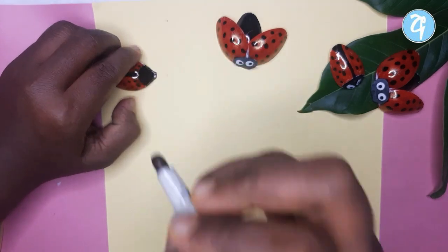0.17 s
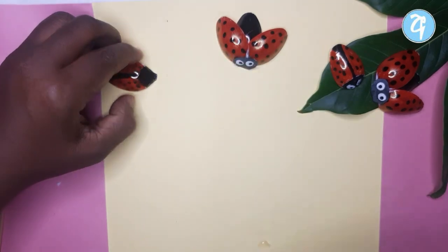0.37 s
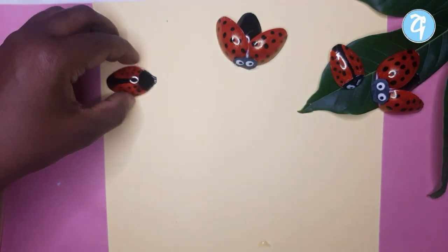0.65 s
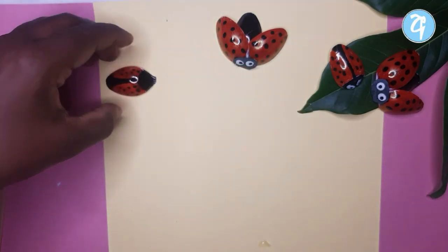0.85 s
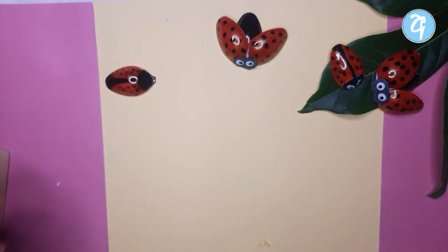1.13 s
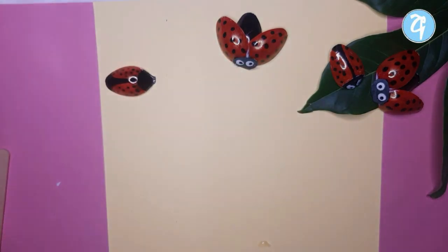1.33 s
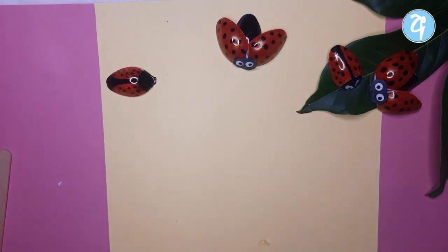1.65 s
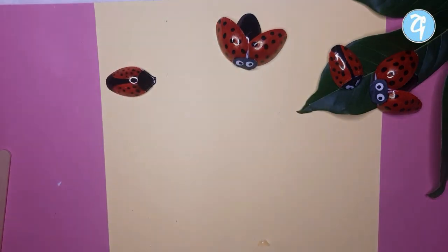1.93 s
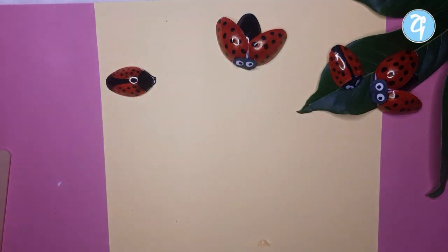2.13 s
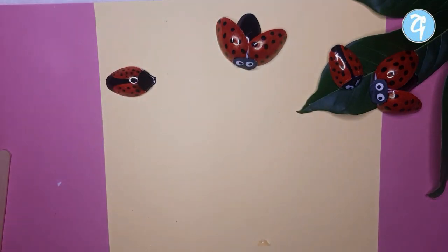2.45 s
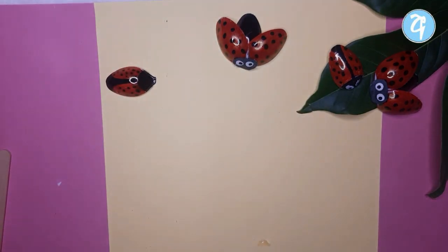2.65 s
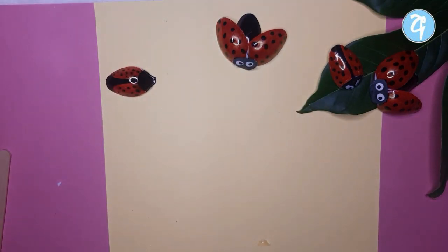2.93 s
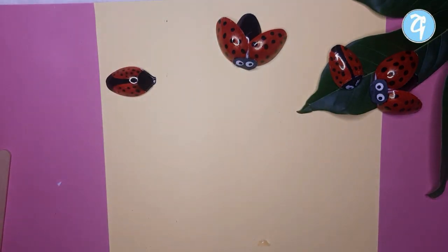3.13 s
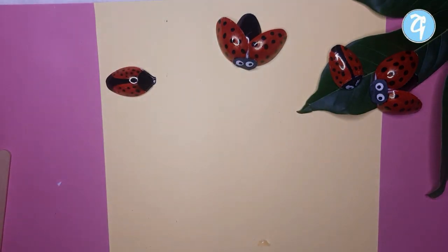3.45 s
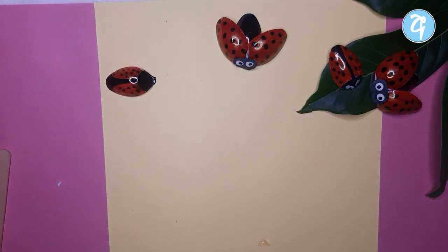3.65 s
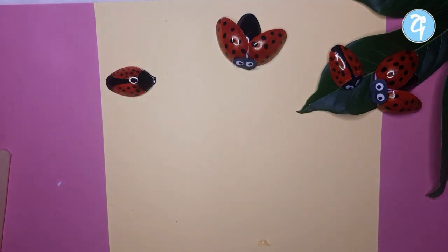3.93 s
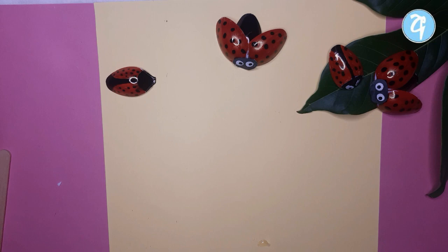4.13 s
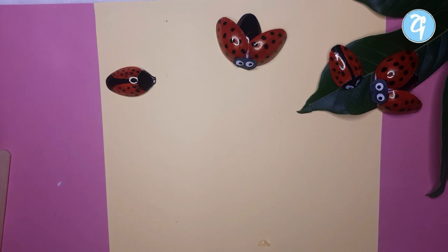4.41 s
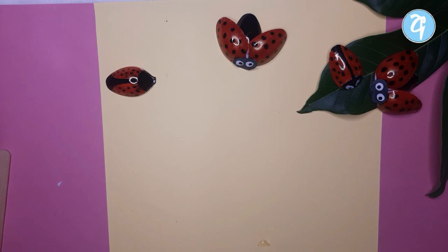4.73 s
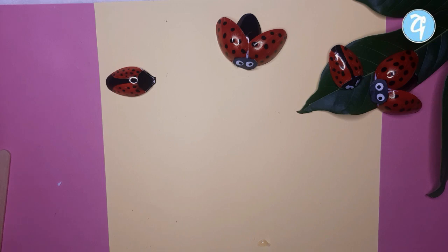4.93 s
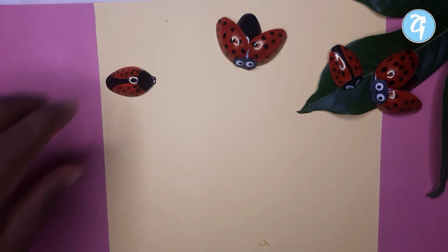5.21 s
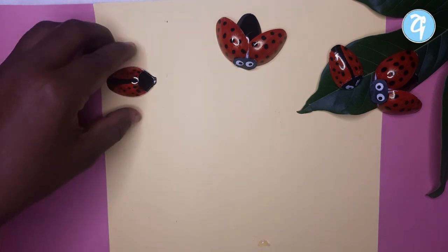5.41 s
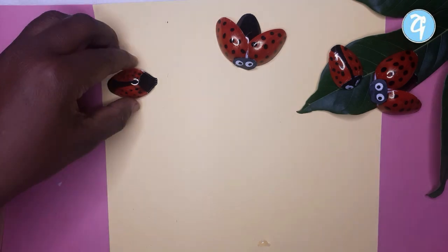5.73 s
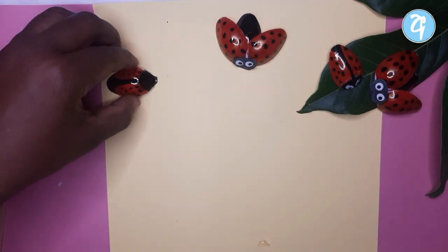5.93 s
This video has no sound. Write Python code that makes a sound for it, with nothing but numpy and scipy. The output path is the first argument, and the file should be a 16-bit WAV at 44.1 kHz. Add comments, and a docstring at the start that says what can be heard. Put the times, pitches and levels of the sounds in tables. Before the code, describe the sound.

In a quiet room, fingers handle a small plastic piece, cap a marker and set it down with three ringing knocks.

```python
"""A quiet room, the microphone close to a paper-covered craft table, the image almost mono.
Up close, fingers shift a small plastic shell over the paper, flick a piece of card and tick on a marker.
Its cap snaps shut, and the marker is put down in three knocks that set the tabletop ringing.
Farther off a cricket chirps, smeared by the walls, over room air, a fan's whine and a faint
electrical buzz."""
import sys
import numpy as np
from scipy import signal
from scipy.fft import rfft, irfft
from scipy.io import wavfile
from scipy.ndimage import uniform_filter1d

SR = 44100
rng = np.random.default_rng(int(sys.argv[2]) if len(sys.argv) > 2 else 0)


def inscribe(sig):
    """Save sig as 16-bit PCM at rate SR to the path in sys.argv[1].

    A 1-D sig is mono; a 2-D sig holds one channel per row.
    Samples are clipped to [-1, 1] before scaling.
    """
    pcm = np.round(np.clip(np.atleast_2d(sig).T, -1, 1) * 32767)
    wavfile.write(sys.argv[1], SR, pcm.astype(np.int16))


N = 267229
TIME = np.arange(N) / SR

# Room air and the rumble under it. Each row: frequency in Hz, density in dB.
AIR_SPECTRUM = [(20, -35), (35, -23), (55, -1), (90, 1), (170, -6.5), (300, -8), (550, 5), (800, 6),
                (1500, -4), (2500, -6.5), (4500, -4.5), (12300, -5), (13600, 0), (16000, -2)]
RUMBLE_SPECTRUM = [(25, -38), (55, 4), (90, 0), (150, -3), (230, -2), (320, 3.5), (420, -4.5), (800, -4),
                   (3000, -37)]
# The rumble's swells. Each row: time in seconds, relative level in dB.
RUMBLE_SWELLS = [(0.0, -72), (0.56, -72), (1.02, -83), (1.26, -78), (1.49, -72.5), (1.86, -72.5),
                 (2.51, -75), (2.71, -73.5), (2.91, -67), (3.14, -69.5), (3.39, -75.5), (3.68, -76),
                 (3.9, -61), (4.04, -66.5), (4.41, -74.5), (4.7, -77)]
# Tone of the electrical buzz. Each row: frequency in Hz, gain in dB.
BUZZ_TONE = [(130, -21.5), (500, 12.5), (1000, 9.5), (1700, 9.5), (4500, 10), (8000, 6.5), (12500, 6.5),
             (14500, -32), (16000, -23)]
# Wing strokes in one chirp. Each row: offset from its middle in seconds, relative level in dB.
WING_STROKES = [(-.024, -9), (-.004, -11), (.016, -22)]

# Friction of rubbed paper, the shell's rim and skin on plastic. Each row: frequency in Hz, density in dB.
PAPER_SPECTRUM = [(150, -43), (500, -2), (1100, -2.5), (1800, -6.5), (2500, -4), (3500, -2.5), (4300, -9),
                  (6000, -7), (9000, -10), (16000, -26)]
RIM_SPECTRUM = [(300, -24), (1100, -12), (1800, -19.5), (2600, 3), (3500, 3), (4400, -9), (5500, -3.5),
                (9000, -17), (16000, -21)]
SKIN_SPECTRUM = [(1000, -15), (4000, -2), (8000, -2), (11000, -2), (13700, 3), (16000, -8)]
# Spells of papery hiss: the second is a brief soft hiss around the card flick, the rest are rubs on paper.
# Each row: start in seconds, length in seconds, level in dB.
HISS_SPELLS = [(0, 0.65, -62), (1.367, 0.034, -58), (2.164, 0.29, -68.5), (3.062, 0.033, -60),
               (3.226, 0.11, -70.5), (3.686, 0.52, -62), (5.25, 0.35, -63.5), (5.683, 0.61, -70)]
# The rim scratches paper; dry skin slides on plastic.
# Each row: middle in seconds, length in seconds, relative level in dB.
RIM_SCRATCHES = [(.159, 0.012, -56.5), (.195, 0.0084, -53), (.337, 0.022, -57), (.578, 0.046, -51.5),
                 (.601, 0.043, -53), (5.346, 0.0067, -51.5)]
SKIN_SLIDES = [(.35, .2, -72), (0.585, 0.066, -59), (2.25, 0.68, -65), (3.234, 0.2, -58.5),
               (3.76, 0.63, -64.5), (3.946, 0.087, -59), (4.173, 1, -64.5)]

# Modes of the card, the small plastic parts, the cap on its barrel, and the struck barrel.
# Each row: frequency in Hz, bandwidth in Hz, relative level in dB.
CARD_MODES = [(377, 180, -19), (700, 370, -7.5), (1040, 340, -11), (2940, 340, -6.5), (3460, 420, -2),
              (4900, 450, -7), (5470, 500, -11), (7050, 480, -15), (10200, 1200, -22)]
PLASTIC_MODES = [(805, 450, -6.5), (1080, 990, -9), (2220, 1700, -15), (2610, 540, 2), (3500, 1140, -1),
                 (4970, 1100, -2), (7300, 900, -5.5), (9000, 950, -4), (13500, 1800, -17)]
CAP_MODES = [(790, 86, -4), (1190, 240, -10), (1435, 350, -4), (2430, 790, -1), (2780, 410, -3.5),
             (3180, 290, -4), (4370, 430, -22), (6600, 610, -8.5), (11500, 1500, -11), (14000, 2000, -11)]
BARREL_MODES = [(480, 170, -6), (920, 170, -13), (1400, 150, -16), (2740, 214, 1.5), (3170, 220, -6.5),
                (4430, 360, -31), (5260, 1200, -31), (7460, 1600, -10), (9100, 770, -15.5),
                (10400, 450, -18.5), (13100, 1100, -21)]
# A fingertip flicks the card. Each row: start in seconds, gain in dB.
CARD_FLICKS = [(1.3915, -43), (1.3976, -24), (1.4133, -40)]
# Clear plastic ticks. Each row: start in seconds, gain in dB, bass in dB, treble in dB, pitch ratio.
PLASTIC_TICKS = [(.519, -38.5, -28, -4, 0.98), (0.5749, -36, -24, -3, 1.08), (.7065, -46.5, -11, -5, 1.46),
                 (2.1685, -32, -4.5, -3, 1.12), (2.3148, -35.5, 2.5, -3, 1.01), (3.048, -35, 5, -5, 1.2),
                 (3.566, -43, 9, 10, 0.66), (3.6363, -30.5, 0, 10, 0.74), (3.7329, -35, 4, -11, 1.07),
                 (3.9213, -41, -2, 9, 0.95), (3.948, -31, -2, -1, 1.03), (4.031, -40, 2, -24, 0.88),
                 (4.045, -39, -5, -21, 0.91), (5.318, -45, -13, -1, 1.3), (5.344, -49, -1, 1, 1.7),
                 (5.552, -47, 3, -5, 1.2)]

# The tabletop's long modes. Each row: frequency in Hz, 60 dB decay time in seconds, relative level in dB.
TABLE_MODES = [(57, 1.5, -46), (97, .8, -28), (100.5, .85, -24.5), (120, .85, -31), (155, .75, -32),
               (237, .75, -32), (311, .75, -35), (460, .6, -34), (498, .55, -34), (536, .55, -34),
               (558, .6, -34), (756, .55, -38), (966, .55, -35), (1049, .55, -39), (1305, .5, -40),
               (1366, .5, -41)]
# Its dense modes. Each row: frequency in Hz, density in dB.
TABLE_SPECTRUM = [(35, -32), (70, -11), (130, -6.5), (200, -5.5), (480, -1), (750, -1), (1350, -3.5),
                  (1900, -8), (2900, -10.5), (4000, -19.5), (6000, -27), (12000, -34.5), (16000, -38)]
# How long those ring. Each row: frequency in Hz, 60 dB decay time in seconds.
TABLE_DECAY = [(100, 1), (400, 0.87), (1200, 0.76), (3000, 0.74), (6000, 0.85), (14000, 1)]
# Hands bump the table. Each row: start in seconds, gain in dB.
HAND_BUMPS = [(2.029, -38), (3.245, -48), (3.947, -28.5), (4.7315, -32), (6.028, -39)]
# The marker meets the table.
# Each row: start in seconds, then gains in dB for the blow, its bass, its treble, barrel ring and boom.
MARKER_KNOCKS = [(4.7649, -7.5, -2.5, -11.5, -32.5, -15), (4.9207, -3.5, 4, -0.5, -8, -1.5),
                 (4.972, -5, 1.5, -1.5, -17.5, -13)]


def undb(db):
    """Decibels to gain."""
    return 10 ** (np.asarray(db) / 20)


def unit(x):
    """Scale to rms 1."""
    return x / np.sqrt(np.mean(x ** 2))


def decay(t60_s, size):
    """An envelope that falls 60 dB in t60_s."""
    return np.exp(-np.log(1000) * TIME[:size] / t60_s)


def at_hz(hz, points):
    """Read (Hz, value) points on a log-frequency axis."""
    frequencies, values = np.transpose(points)
    return np.interp(np.log(np.maximum(hz, 1)), np.log(frequencies), values)


def colour(x, points, size=4096):
    """Minimum-phase filter with the given (Hz, dB) response."""
    cepstrum = irfft(np.log(undb(at_hz(np.fft.rfftfreq(size, 1 / SR), points))))
    cepstrum[1:size // 2] *= 2
    cepstrum[size // 2 + 1:] = 0
    return signal.fftconvolve(x, irfft(np.exp(rfft(cepstrum))))[:len(x)]


def noise(spectrum, size=N):
    """Coloured noise of rms 1."""
    return unit(colour(rng.standard_normal(size), spectrum))


def wander(rate_hz):
    """Smooth random wandering of rms 1."""
    hold = int(SR / rate_hz)
    steps = np.repeat(rng.standard_normal(N // hold + 1), hold)
    return unit(uniform_filter1d(uniform_filter1d(steps, hold), hold)[:N])


def add(track, start_s, sound):
    """Mix a sound into a track."""
    i = max(int(start_s * SR), 0)
    track[i:i + len(sound)] += sound[:max(N - i, 0)]


def ring(modes, scatter=0., size=4096):
    """Short decaying modes; scatter detunes them, as a new contact point would."""
    t, out = TIME[:size], np.zeros(size)
    for hz, width, db in modes:
        hz *= 1 + scatter * rng.standard_normal()
        out += undb(db) * np.exp(-np.pi * width * t) * np.sin(2 * np.pi * hz * t)
    return out


def wash(spectrum, t60s, size=65536):
    """Countless overlapping modes: noise whose half-octave bands die at their own rates."""
    hz = np.fft.rfftfreq(size, 1 / SR)
    bins = rfft(noise(spectrum, size))
    band = np.round(2 * np.log2(np.maximum(hz, 64)))
    return sum(irfft(bins * (band == b)) * decay(at_hz(2 ** (b / 2), t60s), size) for b in np.unique(band))


def chatter(sound, rattle_db, settle_s, size=1024):
    """A contact is one push followed by tiny rattles while the parts settle."""
    push = rng.standard_normal(size) * np.exp(-TIME[:size] / settle_s)
    push *= undb(rattle_db) / np.linalg.norm(push)
    push[0] = 1
    return signal.fftconvolve(sound, push)


def room_air(hiss_db=-65, rumble_gain_db=5.5, flicker_db=-0.1):
    """Room tone: even hiss over a slowly swelling rumble."""
    hiss = undb(hiss_db) * noise(AIR_SPECTRUM)
    swell_db = np.interp(TIME, *np.transpose(RUMBLE_SWELLS)) + rumble_gain_db
    return hiss + noise(RUMBLE_SPECTRUM) * undb(swell_db + flicker_db * wander(30))


def fan_whine(hz=734.5, waver_hz=1.76, level_db=-68):
    """A fan's faint tone wavers in pitch and level."""
    phase = 2 * np.pi * np.cumsum(hz + waver_hz * wander(16)) / SR
    return unit(np.sin(phase)) * undb(level_db + wander(8.2))


def electrical_buzz(hz=137.28, duty=.3705, level_db=-65, drift=.00006):
    """A switched current leaks in: a spike as it turns on, an opposite one as it turns off."""
    cycles = np.cumsum(hz * (1 + drift * wander(1.9))) / SR
    spike_on, spike_off = (np.sinc(((cycles - edge) % 1 - .5) * SR / hz) for edge in (0, duty))
    return undb(level_db) * unit(colour(spike_on - spike_off, BUZZ_TONE))


def chirp_times(count=51, first_s=.0662, gap_s=.1173, gap_growth_s=.000064):
    """The cricket's even beat slows a little and sways early and late."""
    sway_s, period_s, latest_at_s = .007, 2.08, .81
    k = np.arange(count)
    beat = first_s + k * (gap_s + gap_growth_s * k / 2)
    return beat + sway_s * np.cos(2 * np.pi * (beat - latest_at_s) / period_s)


def wing_stroke(detune, start_hz=7700, end_hz=6450, length_s=.018, rasp_hz=200, overtone_db=-19):
    """One stroke of the cricket's wings is a raspy falling whistle."""
    size = int(length_s * SR)
    rasp = np.interp(np.linspace(0, 1, size), np.linspace(0, 1, 50), rng.standard_normal(50))
    hz = np.linspace(start_hz, end_hz, size) * (1 + detune) + rasp_hz * rasp
    phase = 2 * np.pi * np.cumsum(hz) / SR
    return signal.windows.tukey(size, .5) * (np.sin(phase) + undb(overtone_db) * np.sin(2 * phase))


def cricket(level_db=-64, rise_db_per_s=.43, direct_db=-4, walls_t60_s=.42):
    """A cricket well off the microphone; the walls smear its strokes into a pulsing shimmer."""
    chirps = np.zeros(N)
    for middle in chirp_times():
        for offset, db in WING_STROKES:
            detune, late, loud = rng.standard_normal(3)
            add(chirps, middle + offset + .0013 * late, undb(db + loud) * wing_stroke(.0072 * detune))
    walls = rng.standard_normal(SR // 2) * decay(walls_t60_s, SR // 2)
    reflected = signal.fftconvolve(chirps, walls / np.linalg.norm(walls))[:N]
    return unit(undb(direct_db) * chirps + reflected) * undb(level_db + rise_db_per_s * TIME)


def swells(rows):
    """Smooth swells of pressure, each centred on its time."""
    pressure = np.zeros(N)
    for middle, length, db in rows:
        add(pressure, middle - length / 2, undb(db) * np.hanning(int(length * SR)))
    return pressure


def hiss_envelope(attack_s=.0083, release_s=.073):
    """Each spell of papery hiss sets in, holds and dies away."""
    envelope = np.zeros(N)
    for start, length, db in HISS_SPELLS:
        attack = np.clip((TIME - start) / attack_s, 0, 1)
        release = np.exp(-np.maximum(TIME - start - length, 0) / release_s)
        envelope += undb(db) * attack * release
    return envelope


def handling_hiss(slip_chance=.12):
    """Paper fibres catch in uneven slips, the rim rasps, skin slides; a soft hiss surrounds the flick."""
    slips = rng.standard_normal(N) * (rng.random(N) < slip_chance)
    slips *= undb(2.5 * np.minimum(rng.exponential(size=N), 3))
    papery = unit(colour(slips, PAPER_SPECTRUM)) * hiss_envelope() * undb(2 * wander(70))
    rim = unit(colour(slips[::-1], RIM_SPECTRUM)) * swells(RIM_SCRATCHES)
    skin = noise(SKIN_SPECTRUM) * undb(3 * wander(320) - 2) * swells(SKIN_SLIDES)
    return papery + rim + skin


def card_flicks(flutter_t60_s=.12):
    """Stiff card, flicked close by, gives a hollow snap and flutters out."""
    tone = [(100, -26), (350, -4), (900, 1), (1500, 1), (2600, 1.5), (7500, 0), (12000, -12)]
    card = colour(ring(CARD_MODES), tone)
    snap = chatter(card, rattle_db=-10, settle_s=flutter_t60_s / np.log(1000), size=8192)
    out = np.zeros(N)
    for start, db in CARD_FLICKS:
        add(out, start, undb(db) * snap)
    return out


def tick(bass_db, treble_db, pitch=1):
    """One touch of nail or plastic; a tighter grip rings higher, and no two ring quite alike."""
    modes = [(hz * pitch, width, db) for hz, width, db in PLASTIC_MODES]
    contact = chatter(ring(modes, scatter=.04), rattle_db=-3, settle_s=.0016)
    bass = [(120, bass_db - 11), (350, bass_db - 21), (650, bass_db - 4.5)]
    return colour(contact, bass + [(2200, -.5), (4400, -2), (10000, treble_db)])


def plastic_ticks(faint_per_s=20, over_hiss_db=9, spread_db=4):
    """A few clear ticks up close, and faint random ones whose level follows the papery hiss."""
    out, envelope = np.zeros(N), hiss_envelope()
    for start, db, bass_db, treble_db, pitch in PLASTIC_TICKS:
        add(out, start, undb(db) * tick(bass_db, treble_db, pitch))
    for slot, (late, force) in enumerate(rng.random((int(faint_per_s * N / SR), 2))):
        start = (slot + late) / faint_per_s
        gain = np.interp(start, TIME, envelope) * undb(over_hiss_db + spread_db * (2 * force - .5))
        add(out, start, gain * tick(bass_db=-14, treble_db=-17))
    return out


def table_boom(rise_s=.051, size=65536):
    """The tabletop's long modes, which take a moment to build up."""
    t = TIME[:size]
    modes = sum(undb(db) * decay(t60, size) * np.sin(2 * np.pi * hz * t) for hz, t60, db in TABLE_MODES)
    return modes * (1 - np.exp(-t / rise_s))


def table_blow(ring_db=-26, contact_db=11, contact_s=.0082, size=65536):
    """A blow on the tabletop: loud at the contact, then spreading into a long dense ring."""
    contact = undb(contact_db) * np.exp(-TIME[:size] / contact_s)
    return undb(ring_db) * wash(TABLE_SPECTRUM, TABLE_DECAY, size) * (1 + contact)


def hand_bumps(rise_s=.0069):
    """Soft hands bump the table, so its ring sets in gently."""
    bump = colour(table_blow(), [(60, -10), (200, 2), (1300, 3.5), (3000, 2)])
    bump *= 1 - np.exp(-TIME[:len(bump)] / rise_s)
    out = np.zeros(N)
    for start, db in HAND_BUMPS:
        add(out, start, undb(db) * bump)
    return out


def cap_snap(start_s=3.9062, click_db=-9, boom_db=-16, blow_db=-25, damp_s=.039):
    """The cap jumps over its rim; the hands pass a little of the jolt to the table and soon damp it."""
    click_tone = [(100, -5), (450, -13), (900, -13), (1150, 2), (7200, -1.5), (8400, -13),
                  (10200, -5), (11000, -1.5), (16000, -8)]
    jolt_tone = [(55, 4), (100, -6.5), (140, 10), (240, 2), (450, -8), (800, -.5), (1400, 7), (3000, 12)]
    click = chatter(colour(ring(CAP_MODES), click_tone), rattle_db=-14, settle_s=.003)
    jolt = undb(boom_db) * table_boom(rise_s=.0025) + undb(blow_db) * table_blow()
    jolt *= np.exp(-TIME[:len(jolt)] / damp_s)
    out = np.zeros(N)
    add(out, start_s, undb(click_db) * click)
    add(out, start_s, colour(jolt, jolt_tone))
    return out


def marker_knocks():
    """Close to the microphone, one end of the marker touches, then the barrel drops and bounces once."""
    out = np.zeros(N)
    for start, blow_db, bass_db, treble_db, barrel_db, boom_db in MARKER_KNOCKS:
        tone = [(250, bass_db), (600, .0072), (1400, 0), (3000, treble_db)]
        add(out, start, undb(blow_db) * colour(table_blow(), tone))
        add(out, start, undb(barrel_db) * ring(BARREL_MODES))
        add(out, start, undb(boom_db) * table_boom())
    return out


def scene(room_db=-23, side_db=-87, handling_pan_db=-.75, background_pan_db=-.3):
    """Close handling with a little room sound over the background, both a touch right of centre."""
    clicks = plastic_ticks() + card_flicks() + cap_snap()
    room = wash(spectrum=[(100, -16), (1000, 4), (4000, -1.5), (12000, -2.5)],
                t60s=[(200, .46), (2000, .33), (10000, .31)])
    reflected = undb(room_db) * signal.fftconvolve(clicks, room / np.linalg.norm(room))[:N]
    handling = clicks + reflected + marker_knocks() + hand_bumps() + handling_hiss()
    background = cricket() + electrical_buzz() + room_air() + fan_whine()
    sign = np.array([[1], [-1]])  # left, right
    width = sign * undb(side_db) * noise(AIR_SPECTRUM)
    return (handling * undb(sign * handling_pan_db / 2)
            + background * undb(sign * background_pan_db / 2) + width)


def record(dry, low_cut_hz=48, top_hz=15800):
    """The recorder drops the deepest bass and cuts the top."""
    dry = signal.sosfilt(signal.butter(6, low_cut_hz, "high", fs=SR, output="sos"), dry)
    return signal.sosfilt(signal.ellip(10, .2, 70, top_hz, fs=SR, output="sos"), dry)


dry = scene()
out = record(dry)
inscribe(out)
```